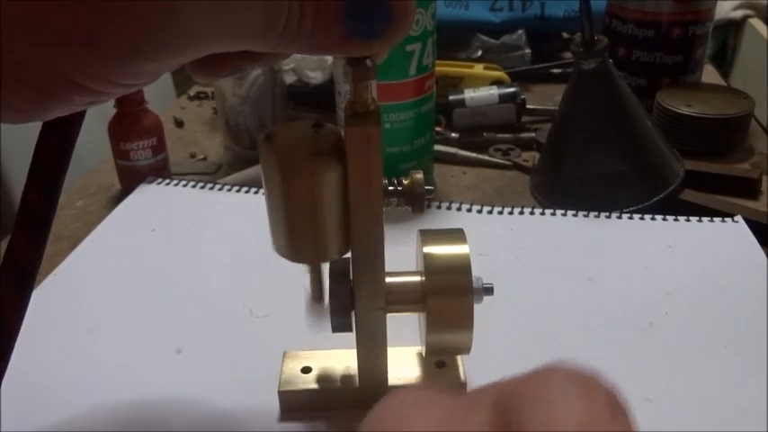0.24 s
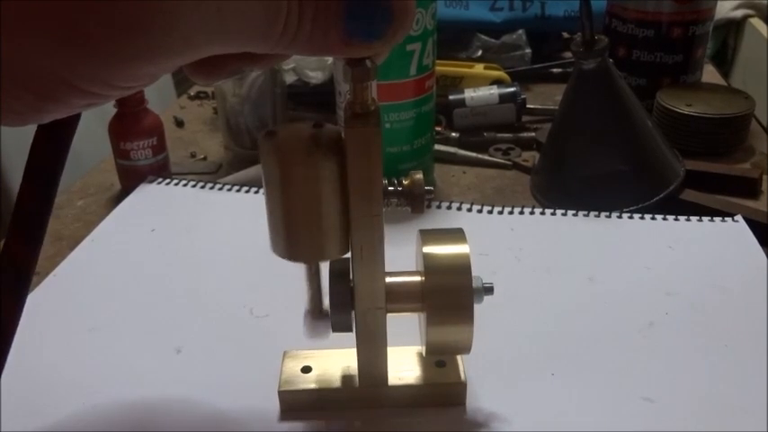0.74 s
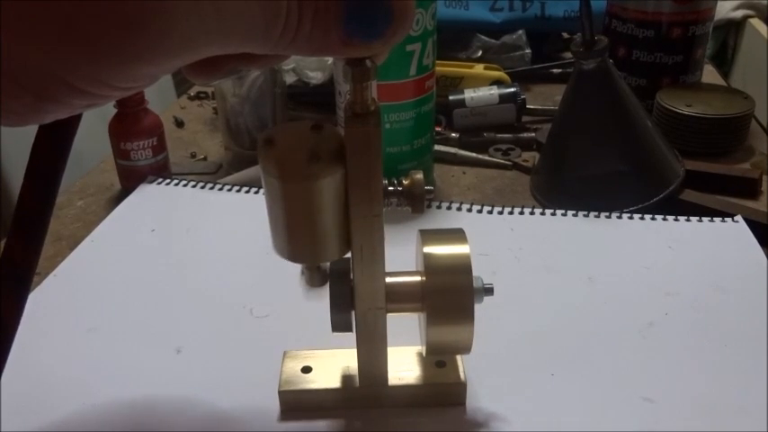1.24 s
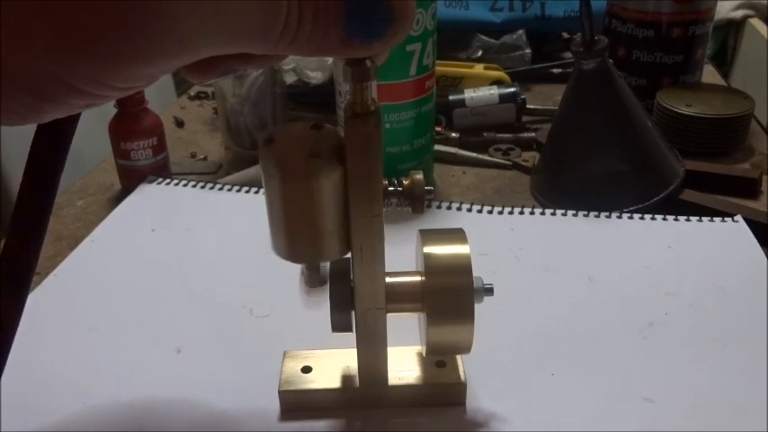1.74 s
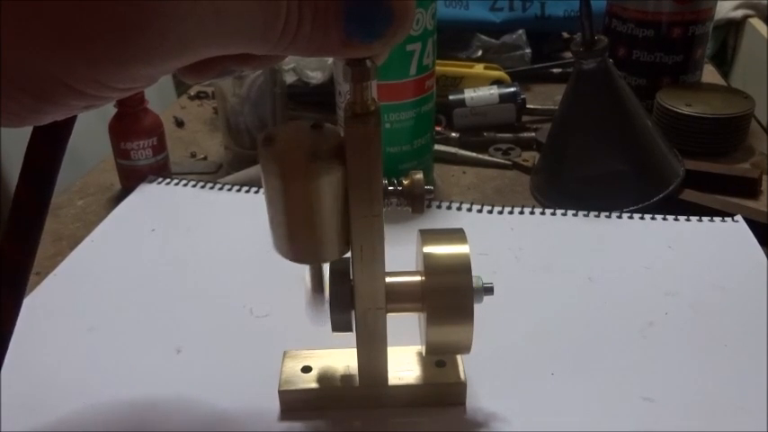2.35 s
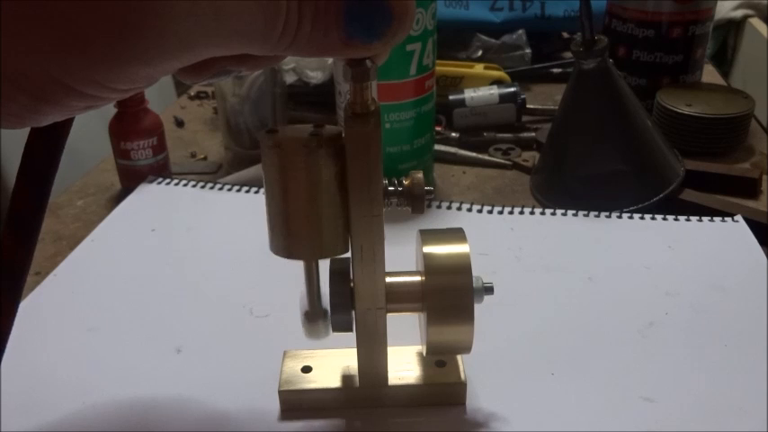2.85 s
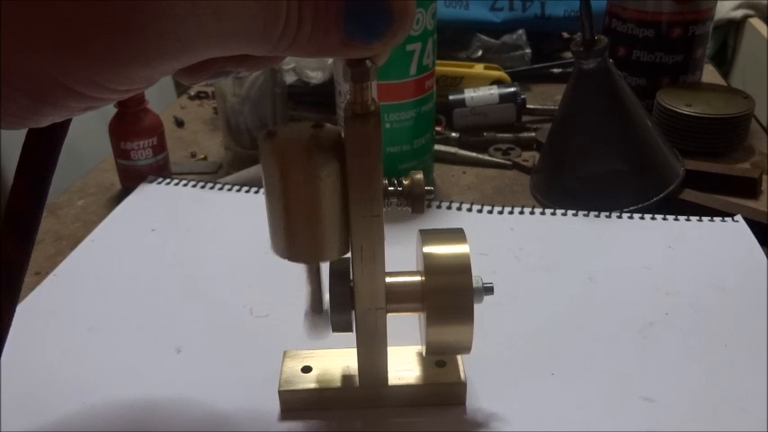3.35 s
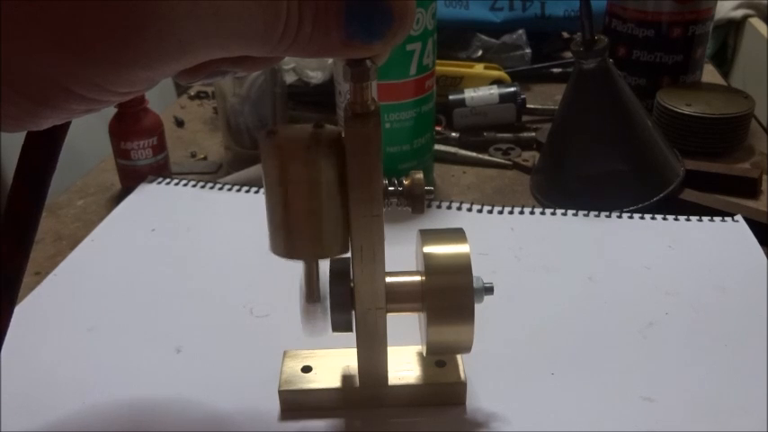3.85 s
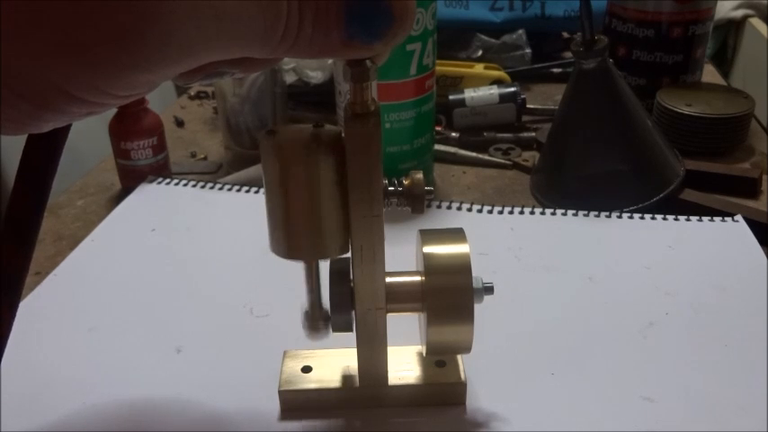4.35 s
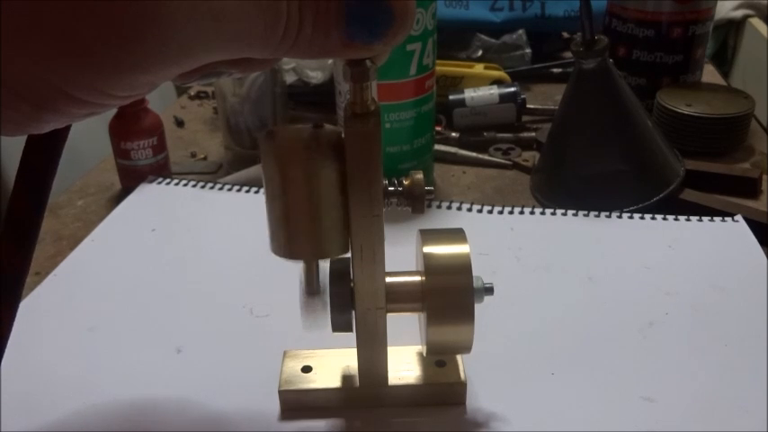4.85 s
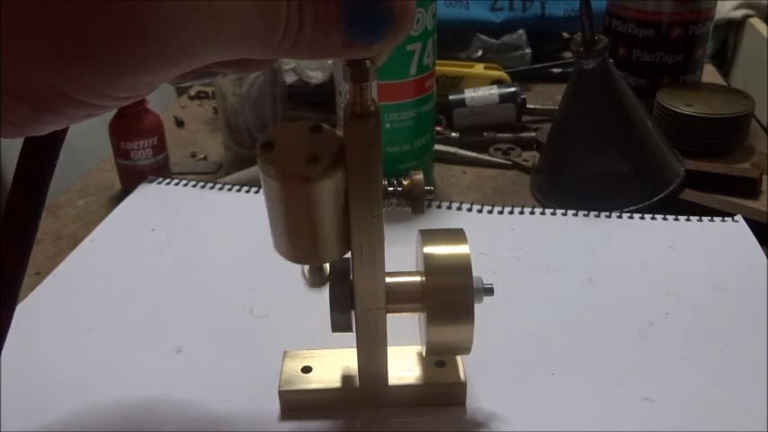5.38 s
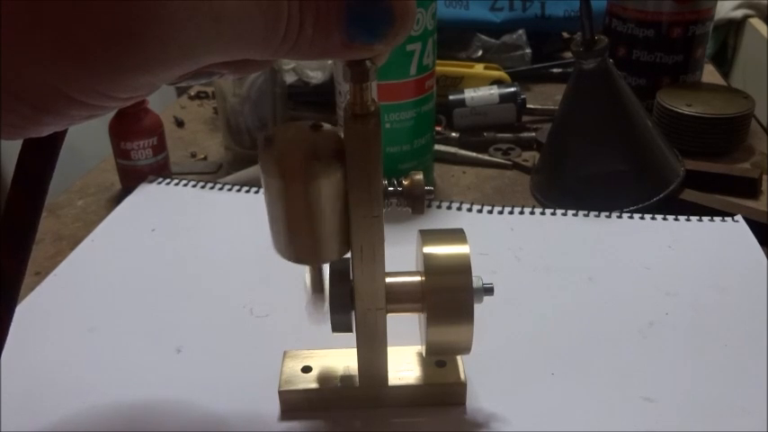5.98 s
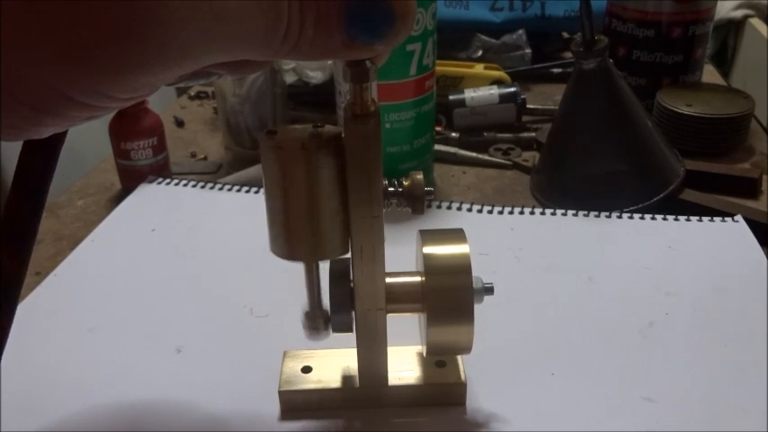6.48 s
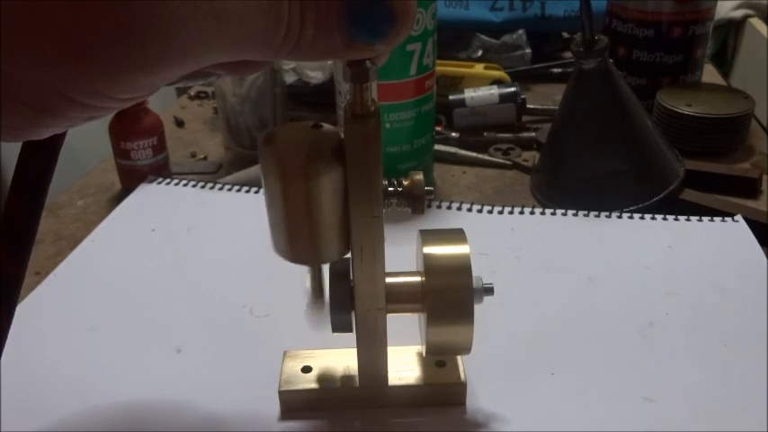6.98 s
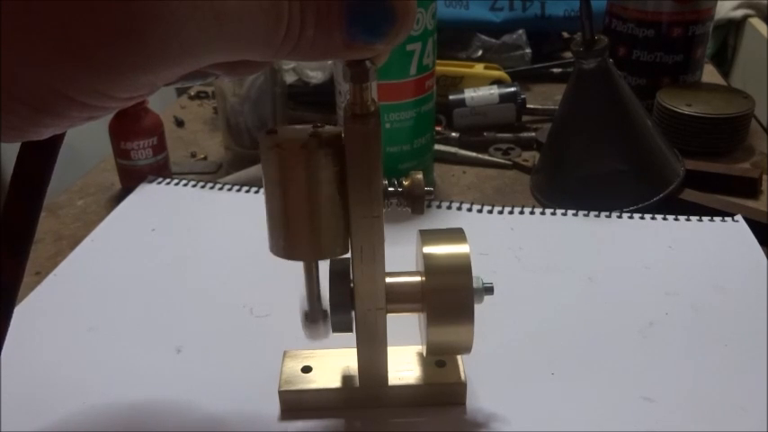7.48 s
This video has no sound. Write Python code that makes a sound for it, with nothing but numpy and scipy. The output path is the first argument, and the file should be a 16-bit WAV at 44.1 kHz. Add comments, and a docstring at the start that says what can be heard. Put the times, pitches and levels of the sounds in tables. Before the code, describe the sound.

Close, dry and nearly centred: a miniature pressure-driven engine buzzes along in a fast, regular chuff. Crisp airy puffs alternate with softer hiss, while light metal knocks rattle the frame and bench, boomier at first. A very high falling whistle marks each exhaust opening, briefly weakening a few times. Speed rises slightly at the start, then holds with small wavering until the sound cuts off still running, in a small cluttered workshop.

```python
"""On a workbench, a small brass oscillating-cylinder engine held down on a pad runs at about 13 turns a second.
Each turn the crank knocks at both dead centres and sets modes of frame and bench ringing.
Gated noise jets make the leak of the power stroke and the exhaust puff; a falling sine chirps as the port opens.
Steady seeping hiss, the rub of piston and bearing and a short, dull room tail lie underneath."""
import sys
import numpy as np
from scipy import signal
from scipy.fft import rfft, irfft
from scipy.io import wavfile

SR = 44100
rng = np.random.default_rng(int(sys.argv[2]) if len(sys.argv) > 2 else 0)


def pcm_store(signal):
    """Save signal as 16-bit PCM."""
    levels = np.round(np.clip(np.atleast_2d(signal), -1, 1) * 32767)
    wavfile.write(sys.argv[1], SR, levels.astype(np.int16).T)


N = 340540
TIME = np.arange(N) / SR
CRUISE_RPM = 770   # reference speed for everything that changes with engine speed

# colour of the leaking jet and of the steady seep: (frequency [Hz], level [dB])
LEAK_COLOUR = [(600.0, -7.5), (1000.0, -7.5), (1900.0, -13), (3000.0, -12), (3800.0, -6.5), (4400.0, -12),
               (5000.0, -10.5), (6500.0, -7.5), (8600.0, -1.2), (9500.0, -0.5), (10300.0, 1), (12600.0, -5),
               (14000.0, -5.5), (15600.0, -11.5)]
# narrow resonances of the steam passages, shared by both jets and the seep:
# (centre [Hz], width [Hz], level [dB])
PASSAGE_RESONANCES = [(4380, 160, -5), (4946, 280, 8), (5035, 145, -12), (6820, 300, 5), (7040, 340, -5),
                      (8910, 250, 2), (10200, 220, 1), (10400, 120, 1), (12500, 450, 0.5),
                      (13000, 250, 0.5)]


def from_db(db):
    """Decibels to gain."""
    return 10 ** (np.asarray(db) / 20)


def read(rows, at):
    """Every column of a table, joined by straight lines along its first column."""
    where, *columns = np.transpose(rows)
    return [np.interp(at, where, column) for column in columns]


def rms_one(x):
    """Scale to unit power."""
    return x / np.sqrt(np.mean(x ** 2) + 1e-20)


def butter(x, hz, kind, order=2):
    """Causal Butterworth filter."""
    sos = signal.butter(order, np.clip(hz, 10, .45 * SR), kind, fs=SR, output="sos")
    return signal.sosfilt(sos, x)


def noise(spectrum, resonances=()):
    """Unit noise of a given colour, with narrow peaks and dips on top."""
    hz, db = np.transpose(spectrum)
    freqs = np.maximum(np.arange(N // 2 + 1) * SR / N, 1)
    colour_db = np.interp(np.log(freqs), np.log(hz), db)
    for centre, width, peak_db in resonances:
        colour_db += peak_db / (1 + (2 * (freqs - centre) / width) ** 2)
    white = rfft(rng.standard_normal(N))
    return rms_one(irfft(white * from_db(colour_db), N))


def flutter(per_s):
    """Random curve of unit power with a new value per_s times a second, joined by straight lines."""
    return rms_one(np.interp(TIME * per_s, np.arange(N), rng.standard_normal(N)))


def ring(force, hz, t60):
    """Two-pole resonator: a unit impulse sets a decaying sine of starting height 1 ringing."""
    decay = from_db(-60 / (t60 * SR))
    w = 2 * np.pi * hz / SR
    return signal.lfilter([0, np.sin(w)], [1, -2 * decay * np.cos(w), decay * decay], force + 1e-18)


def passes(turns, angle):
    """Times at which the crank passes an angle."""
    whole_turns = np.arange(np.ceil(turns[0] - angle), turns[-1] - angle)
    return np.interp(whole_turns + angle, turns, TIME)


def impulses(times, db):
    """One impulse at each time."""
    out = np.zeros(N)
    out[np.clip((times * SR).astype(int), 0, N - 1)] = from_db(db)
    return out


def opening(angle, port):
    """How far a port is open, from 0 to 1: it opens, holds and shuts as the cylinder rocks."""
    opens, rise, shut, fall = port
    since, span = (angle - opens) % 1, (shut - opens) % 1
    return np.clip(np.minimum(since / rise, (span - since) / fall), 0, 1)


def swells(angle, rows):
    """Rounded rises or dips in dB that come back at the same crank angles."""
    total_db = 0
    for at, width, db in rows:
        distance = (angle - at + .5) % 1 - .5   # shortest way round the turn
        total_db = total_db + db * np.exp(-(distance / width) ** 2)
    return total_db


def knocks(turns, pressure_db, rpm, scatter_db=0.0, return_scatter_db=1.0, return_db=1.74,
           return_db_per_rpm=0.06, mode_scatter_db=0.46, boom_below_hz=200, clack_above_hz=600):
    """The crank pin changes sides at each dead centre and rings the frame; return knocks grow with speed."""
    # slack taken up at the dead centres: a tick, a thump and its rebound,
    # then a softer thump, a tick, a clack and its bounce:
    # (crank angle [turns], direction [sign], level [dB], centre of the modes struck [Hz],
    #  their spread [octaves], share of the mode's ring time [ratio], timing scatter [s])
    contacts = [(-.009, 1, 2.5, 4240, 0.35, 0.27, .0002), (-.005, 1, -1, 300, 1.23, 0.97, 0.00012),
                (0.094, 1, -14, 302, 0.97, 0.6, 0.000084), (0.529, -1, -3, 198, 1.06, 0.37, 0.00039),
                (.552, 1, -3, 2800, 0.27, 0.38, 0.00021), (.56, 1, -1, 1190, 0.99, 0.99, 0.00024),
                (0.634, 1, -6, 1120, 0.17, 0.95, 0.00041)]
    # modes of the engine frame on the bench, each ring time scaled by the contact's share:
    # (frequency [Hz], level [dB], full t60 [s], direction of swing [sign])
    body_modes = [(77, -46, 0.13, 1), (128.6, -26.5, 0.088, 1), (162, -32, 0.098, 1),
                  (243.3, -33.5, 0.33, -1), (275, -17, 0.045, -1), (347, -33.5, 0.088, -1),
                  (445.7, -30.5, 0.1, 1), (503, -34, 0.096, 1), (537, -40.5, 0.39, 1),
                  (674, -32.5, 0.028, -1), (864, -31.5, 0.04, -1), (972, -45, 0.61, 1),
                  (1094, -27.5, 0.019, -1), (1216, -42, 0.079, -1), (2420, -40, 0.026, 1),
                  (2970, -28.5, 0.014, -1), (4120, -30, 0.004, 1), (4650, -20.5, 0.013, -1),
                  (5750, -14.5, 0.0087, 1), (6250, -49, 0.0056, -1)]
    # how the hand's grip lets the engine sound: (time [s], bench boom [dB], bearing clack [dB])
    grip = [(0.05, 4, -3.5), (0.8, 2.5, -1.8), (2.9, -1.6, 0), (5.9, -1.5, -0.5), (7.6, -1, 0.5)]
    out = np.zeros(N)
    boom_db, clack_db = read(grip, TIME)
    return_knock_db = return_db + return_db_per_rpm * (rpm - CRUISE_RPM)
    for angle, direction, db, centre_hz, octaves, ring_share, scatter_s in contacts:
        times = passes(turns, angle)
        # chance columns: timing, force, then one for each mode
        chance = rng.standard_normal((len(times), len(body_modes) + 2))
        times = times + scatter_s * chance[:, 0]
        force_db = db + np.interp(times, TIME, pressure_db)
        if direction < 0:
            force_db += np.interp(times, TIME, return_knock_db) + return_scatter_db * chance[:, 1]
        else:
            force_db += scatter_db * chance[:, 1]
        for k, (hz, mode_db, t60, swing) in enumerate(body_modes):
            # soft contacts reach low modes, hard ones high
            reach = np.exp(-.5 * (np.log2(hz / centre_hz) / octaves) ** 2)
            if reach < .03:
                continue
            grip_db = (hz < boom_below_hz) * np.interp(times, TIME, boom_db)
            grip_db += (hz > clack_above_hz) * np.interp(times, TIME, clack_db)
            blow_db = force_db + mode_db + grip_db + mode_scatter_db * chance[:, k + 2]
            blows = impulses(times, blow_db)
            out += np.sign(direction * swing) * reach * ring(blows, hz, t60 * ring_share)
    return out


def exhaust(angle, pressure_db, rpm, level_db=-18, shelf_hz=9500, sputter_db=0.78, sputter_per_s=600,
            uneven_db=0.55, uneven_per_s=13):
    """The returning piston drives a sputtering jet out of the port, brightest in mid-stroke, puffs uneven."""
    # colour of the exhaust jet: (frequency [Hz], level [dB])
    colour = [(600.0, -37.5), (1000.0, -33.5), (1900.0, -27.5), (3800.0, -21.5), (4400.0, -22.5),
              (5600.0, -16), (7300.0, -9), (8650.0, 0), (9550.0, -9), (10350.0, -3.5), (11300.0, -5),
              (12700.0, -10.5), (14000.0, -5), (15600.0, -14)]
    # each puff starts and ends with a spurt, parted from its body by a dip:
    # (crank angle [turns], width [turns], level [dB])
    spurts = [(.505, 0.013, 1), (.538, .016, -2), (.86, .016, -1.5), (.897, 0.016, 2)]
    # port timing: (opens at [turns], takes to open [turns], shut at [turns], takes to shut [turns])
    port = (0.42, 0.093, 0.96, 0.05)
    brightest_turn, dulling_db_per_turn2, dulling_db_per_rpm = 0.69, 95, 0.0257
    # duller by the square of the distance from mid-stroke; brighter when the engine is slow
    treble_db = -dulling_db_per_turn2 * (angle - brightest_turn) ** 2
    treble_db -= dulling_db_per_rpm * (rpm - CRUISE_RPM)
    jet = noise(colour, PASSAGE_RESONANCES)
    freqs = np.arange(N // 2 + 1) * SR / N
    treble_share = 1 - 1 / (1 + (freqs / shelf_hz) ** 8)
    treble = irfft(rfft(jet) * treble_share, N)
    lower = jet - treble
    jet = from_db(uneven_db * flutter(uneven_per_s)) * lower + from_db(treble_db) * treble
    flow_db = level_db + pressure_db + swells(angle, spurts) + sputter_db * flutter(sputter_per_s)
    return jet * opening(angle, port) * from_db(flow_db)


def leak(angle, pressure_db, level_db=-28.5, sputter_db=2.0, sputter_per_s=500):
    """Pressure escapes between cylinder and port face while the inlet is open, most just after it opens."""
    # surges of the leak: (crank angle [turns], width [turns], level [dB])
    surges = [(.0, 0.027, 4.8), (.085, 0.025, 3.9)]
    # port timing: (opens at [turns], takes to open [turns], shut at [turns], takes to shut [turns])
    port = (0.94, 0.032, 0.41, 0.072)
    jet = noise(LEAK_COLOUR, PASSAGE_RESONANCES)
    flow_db = level_db + pressure_db + swells(angle, surges) + sputter_db * flutter(sputter_per_s)
    return jet * opening(angle, port) * from_db(flow_db)


def faltering(at, recovery_s):
    """What is left at a given time of the whistle's falters, which fade exponentially, in dB."""
    # the whistle falters, going weak and flat, and recovers: (time [s], loss [dB])
    falters = [(1.13, 22), (1.37, 10), (4.26, 20)]
    return sum(loss_db * np.exp(-(at - start) / recovery_s) for start, loss_db in falters if at >= start)


def chirps(turns, rpm, attack_s=0.0016, release_s=0.0015, fall_hz_per_s=190000, waver_hz=130,
           scatter_hz=50, scatter_s=0.00025, waver_db=1.0):
    """While the exhaust port is only a slit the jet whistles; the pitch falls as the slit widens."""
    whistle_turn, whistle_hz = 0.424, 13930
    whistle_db, whistle_db_per_rpm = -9, 0.08   # weaker when the engine is slow
    level_recovery_s, pitch_recovery_s, flat_hz_per_db = 0.069, .2, 22
    out = np.zeros(N)
    lag = np.arange(-SR // 200, SR // 200) / SR
    shape = 1 / (1 + (lag / np.where(lag < 0, attack_s, release_s)) ** 2 / 2) ** 2
    for at in passes(turns, whistle_turn):
        late, sharp, *wavers = rng.standard_normal(size=10)
        hz = whistle_hz - flat_hz_per_db * faltering(at, pitch_recovery_s) + scatter_hz * sharp
        speed_db = whistle_db_per_rpm * (np.interp(at, TIME, rpm) - CRUISE_RPM)
        db = whistle_db - faltering(at, level_recovery_s) + speed_db
        # one random curve bends both pitch and level
        waver = np.interp(lag, np.linspace(lag[0], lag[-1], len(wavers)), wavers)
        phase = 2 * np.pi * np.cumsum(hz - fall_hz_per_s * lag + waver_hz * waver) / SR
        where = int((at + scatter_s * late) * SR) + np.arange(len(lag)) - len(lag) // 2
        out[np.clip(where, 0, N - 1)] += shape * from_db(db + waver_db * waver) * np.sin(phase)
    return out


def seep(pressure_db, level_db=-35.5):
    """A little pressure escapes at every crank angle as a hiss that follows the supply."""
    return from_db(level_db + pressure_db) * noise(LEAK_COLOUR, PASSAGE_RESONANCES)


def rub(level_db=-36.5):
    """Rubbing of piston and bearing, heard through the bench as steady coloured noise."""
    # colour of the rubbing: (frequency [Hz], level [dB])
    colour = [(25, -23), (50, -18), (80, -4.5), (140, -7.5), (260, -2), (400, -9), (550, -5), (740, -14),
              (900, -16), (970, -2), (1080, -33), (1300, -9), (1600, -34.5), (4000, -16.5)]
    return from_db(level_db) * noise(colour)


def two_ports(x, t60_s=0.082):
    """Nearby clutter scatters sound into two microphone ports with different phases but equal strength."""
    # difference between the ports: (frequency [Hz], side minus mid [dB])
    width = [(60, -26), (140, -31), (330, -16.5), (500, -14.5), (1200, -19), (1700, -23), (2600, -72),
             (5000, -40), (9000, -23.5), (15000, -23)]
    freqs = np.maximum(np.arange(N // 2 + 1) * SR / N, 1)
    hz, db = np.transpose(width)
    side_db = np.interp(np.log(freqs), np.log(hz), db)
    decay = from_db(np.maximum(-60 * TIME / t60_s, -300))
    scatter = rfft(rng.standard_normal(N) * decay)
    skew = 1j * np.sqrt(2) * np.sin(np.angle(scatter))   # a quarter turn of phase keeps the strengths equal
    side = irfft(rfft(x) * from_db(side_db) * skew, N)
    return x + side * np.array([[1], [-1]])


def workshop(x, t60_s=0.64, level_db=-30, cut_hz=520, bright_db=-9):
    """A short, dull tail of decaying noise from the cluttered room, different in each channel."""
    t = TIME[:SR // 2]
    tails = rng.standard_normal((2, len(t))) * from_db(-60 * t / t60_s) * (t > .003)
    tails /= np.sqrt(np.sum(tails ** 2, axis=1, keepdims=True))
    dull = butter(tails, cut_hz, "low", order=1)
    tails = butter(dull + from_db(bright_db) * tails, 234, "high")
    return from_db(level_db) * signal.fftconvolve(x[None], tails, axes=1)[:, :N]


def scene(start_turn=.4769, radiation_hz=58, jet_low_hz=140):
    """Crank angle times knocks, jets and chirps; supply pressure sets the strength of knocks, jets and seep."""
    # crank speed: (time [s], speed [turns per minute])
    speed = [(0.0, 685.3), (0.4, 731.9), (1.1, 752.7), (1.32, 746.9), (1.86, 770.5), (2.1, 753.5),
             (2.43, 773.0), (2.72, 764.6), (2.89, 779.1), (3.29, 766.7), (3.34, 774.5), (4.18, 770.6),
             (4.41, 782.5), (5.08, 775.7), (6.83, 779.2), (7.11, 770.3), (7.26, 780.7), (7.72, 760.5)]
    # supply pressure: (time [s], level [dB])
    pressure = [(0.08, 0.5), (1.47, -1.5), (2.09, 0), (2.8, 0.4), (2.95, -1.6), (3.65, 0.0), (3.73, -0.5),
                (3.96, 0), (4.35, 0), (4.43, 0), (5.35, 0.7), (5.51, 0.3), (6.05, 0.45), (6.51, -0.95),
                (7.28, 0.74), (7.67, -0.7)]
    rpm, = read(speed, TIME)
    pressure_db, = read(pressure, TIME)
    turns = start_turn + np.cumsum(rpm) / 60 / SR
    angle = turns % 1
    # a small frame radiates no deep bass
    frame = butter(knocks(turns, pressure_db, rpm), radiation_hz, "high", order=4)
    steam = exhaust(angle, pressure_db, rpm) + leak(angle, pressure_db)
    steam += chirps(turns, rpm) + seep(pressure_db)
    engine = frame + butter(steam, jet_low_hz, "high") + rub()
    return two_ports(engine) + workshop(engine)


def record(dry, cutoff_hz=15900):
    """The top is cut steeply by an elliptic low-pass."""
    return signal.sosfilt(signal.ellip(12, .1, 80, cutoff_hz, fs=SR, output="sos"), dry)


dry = scene()
out = record(dry)
pcm_store(out)
```